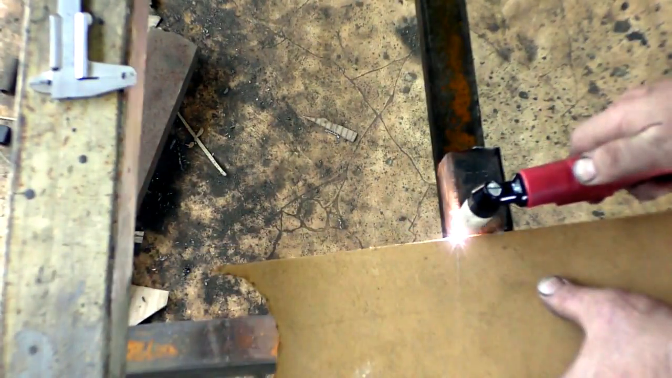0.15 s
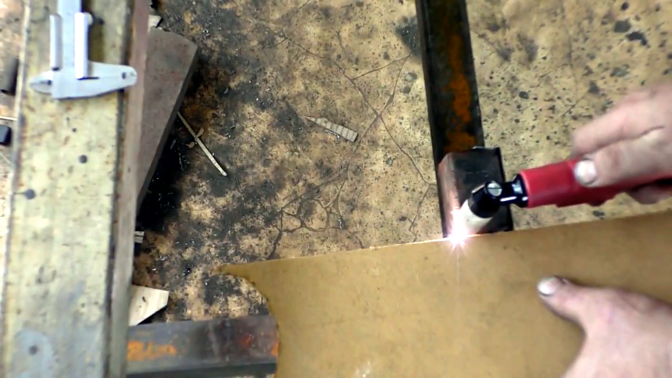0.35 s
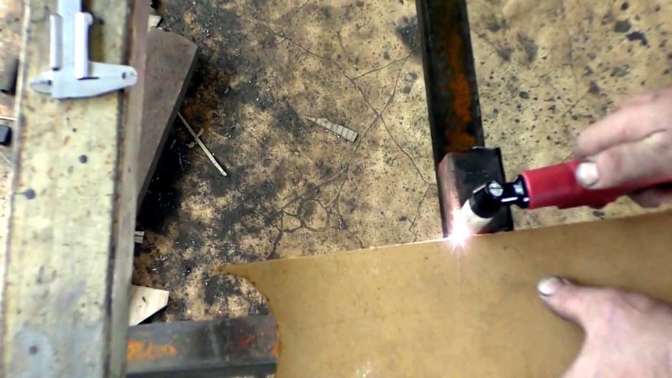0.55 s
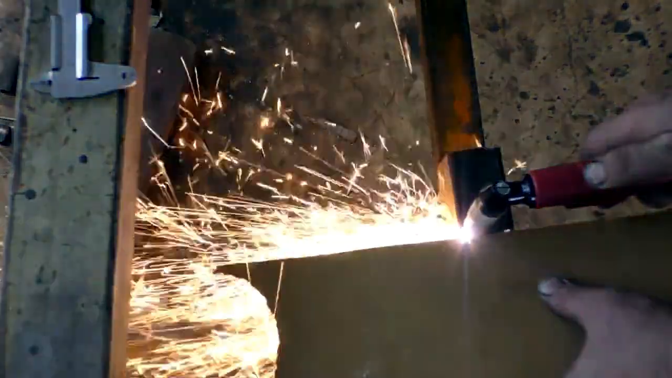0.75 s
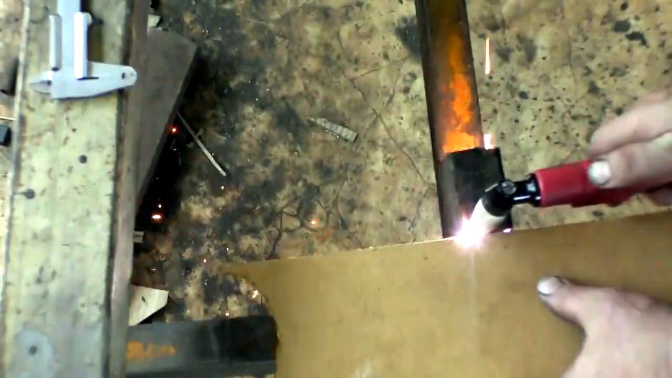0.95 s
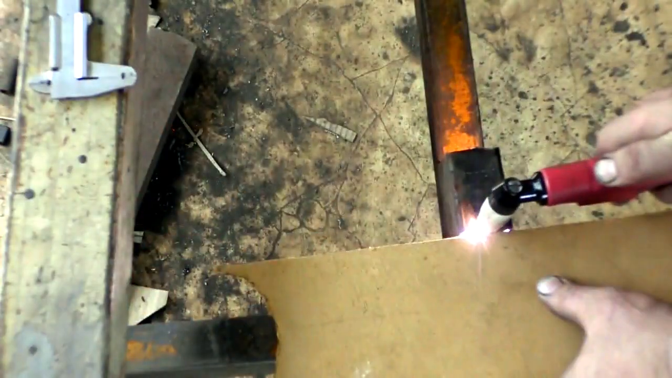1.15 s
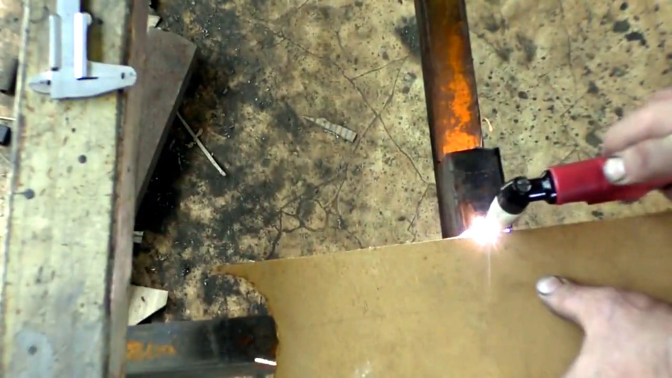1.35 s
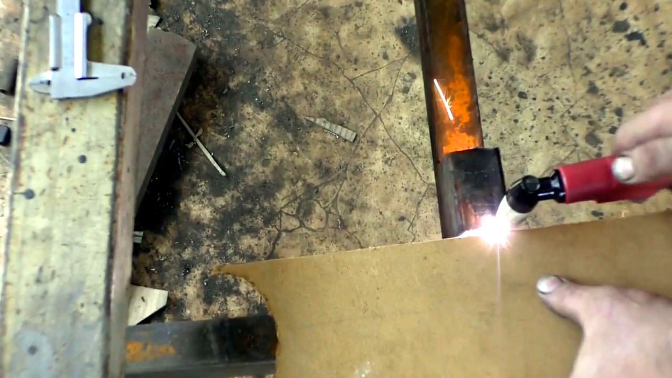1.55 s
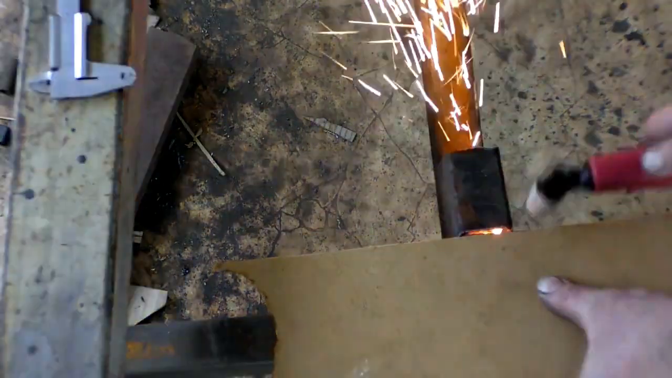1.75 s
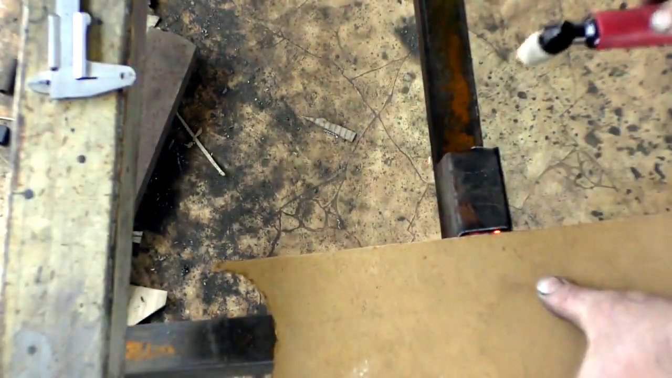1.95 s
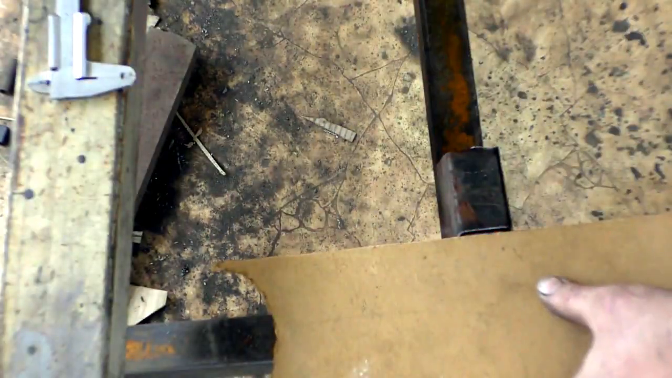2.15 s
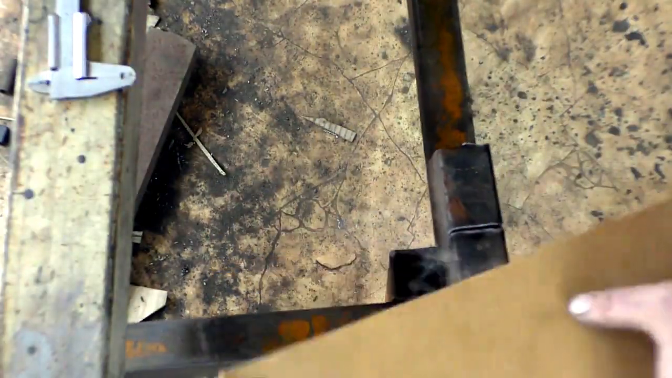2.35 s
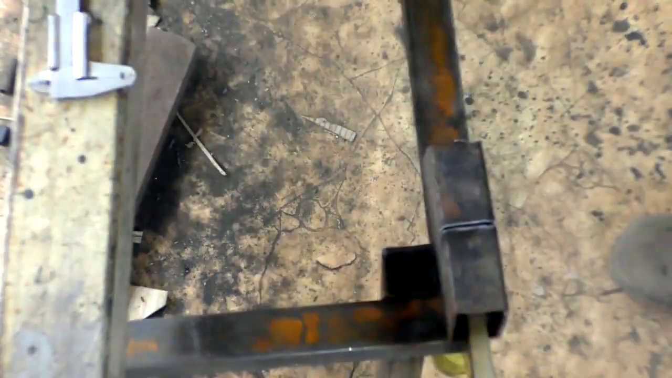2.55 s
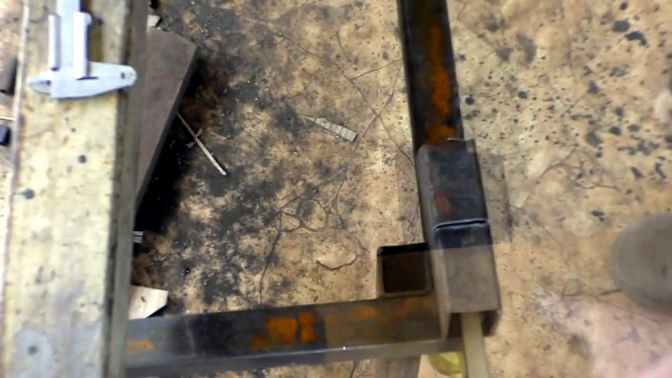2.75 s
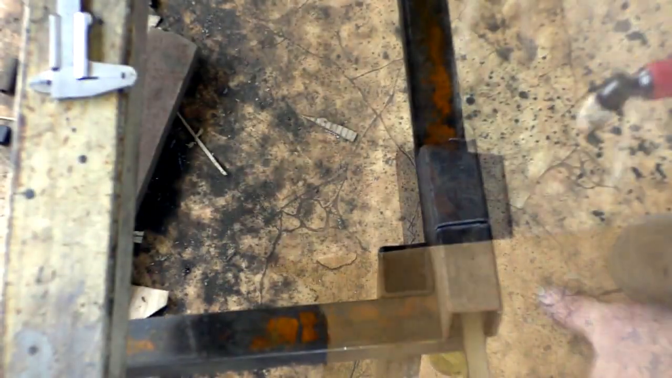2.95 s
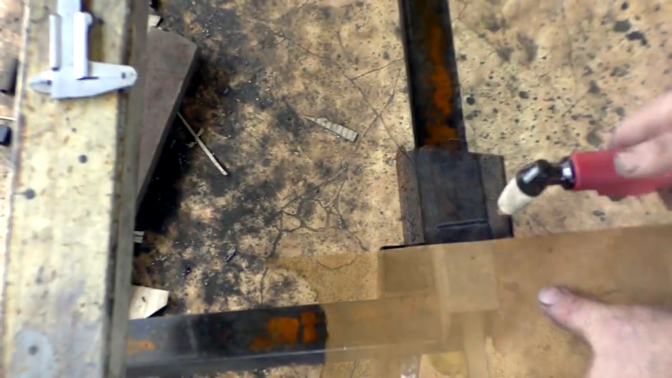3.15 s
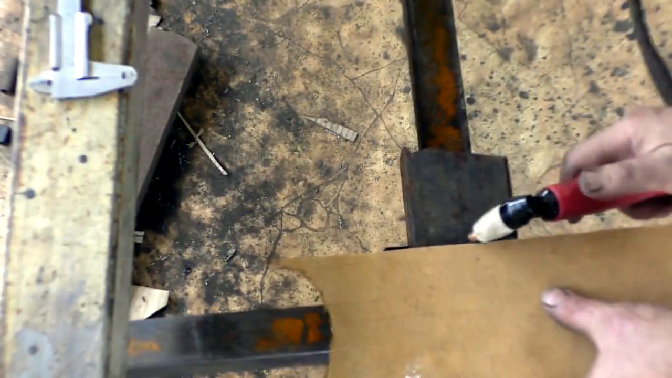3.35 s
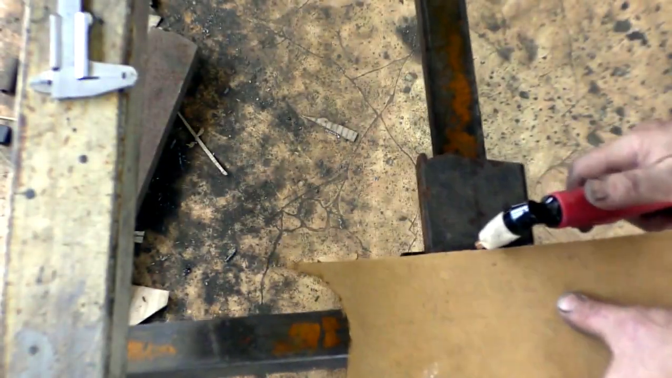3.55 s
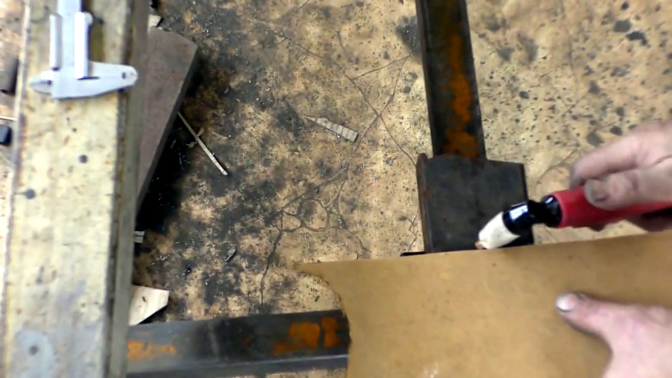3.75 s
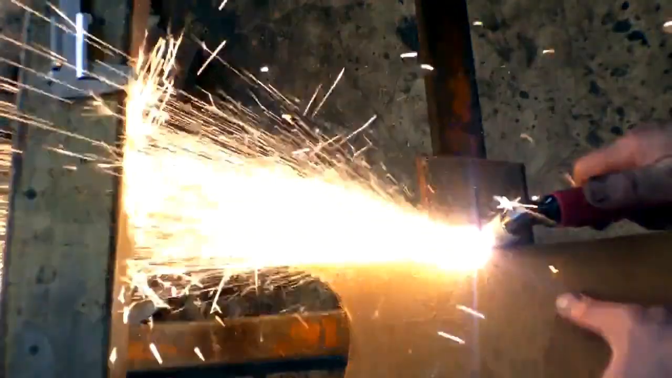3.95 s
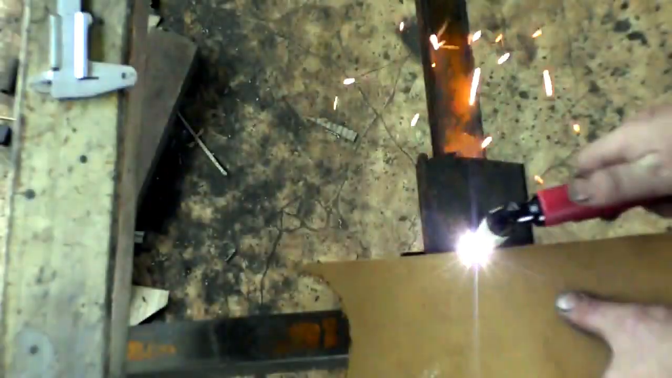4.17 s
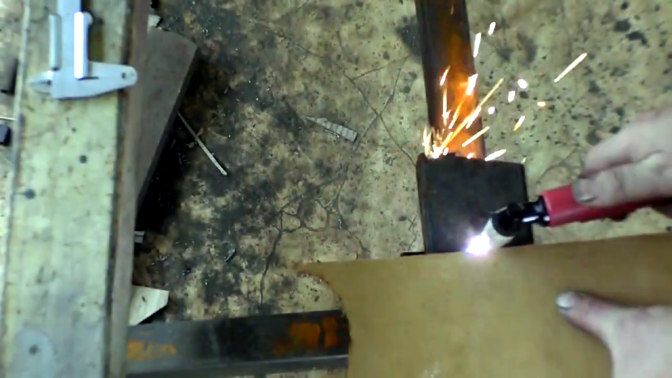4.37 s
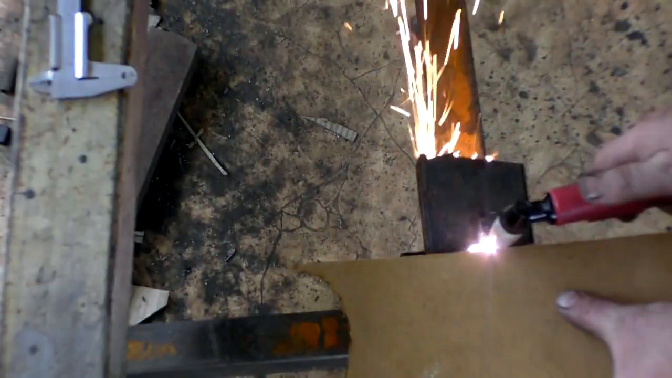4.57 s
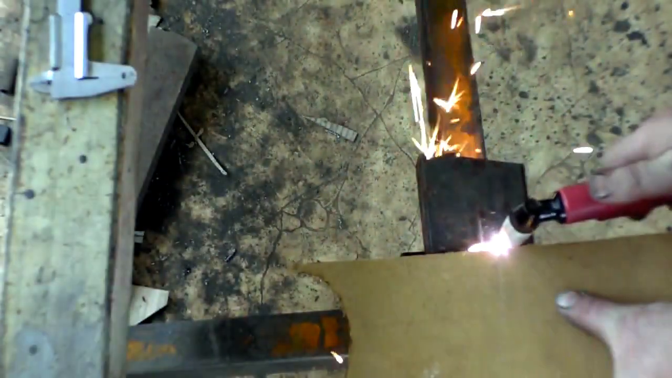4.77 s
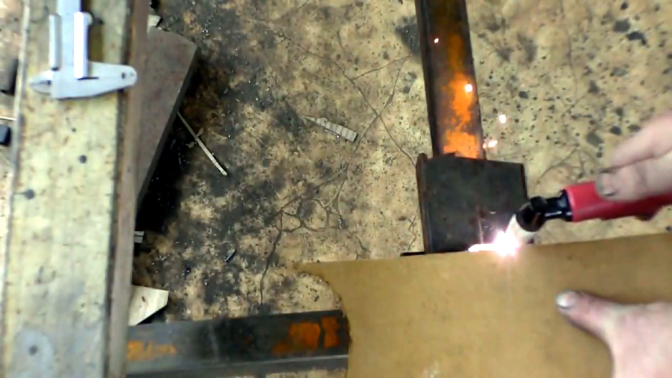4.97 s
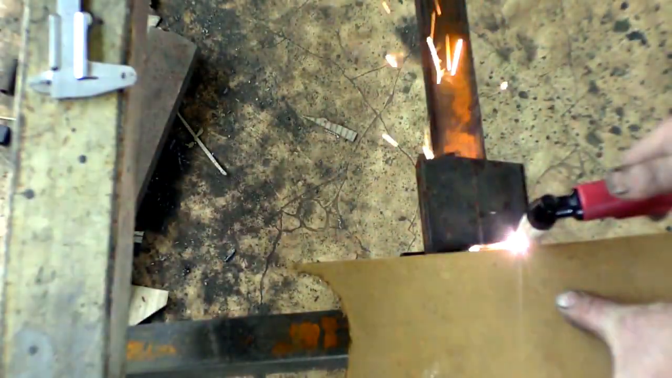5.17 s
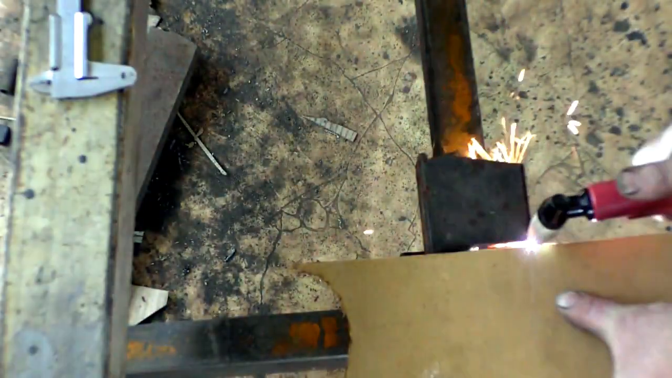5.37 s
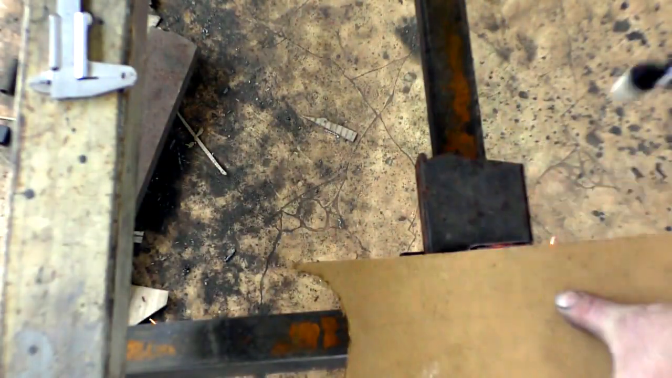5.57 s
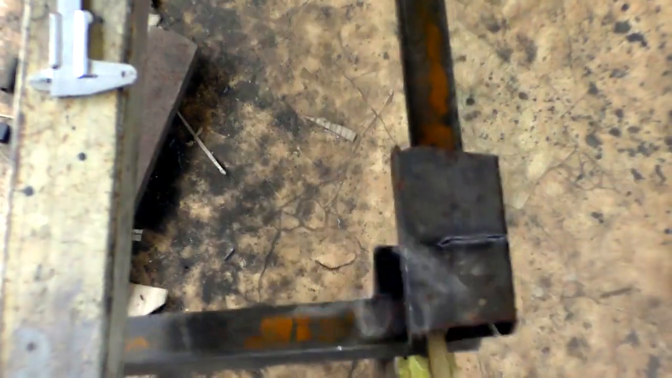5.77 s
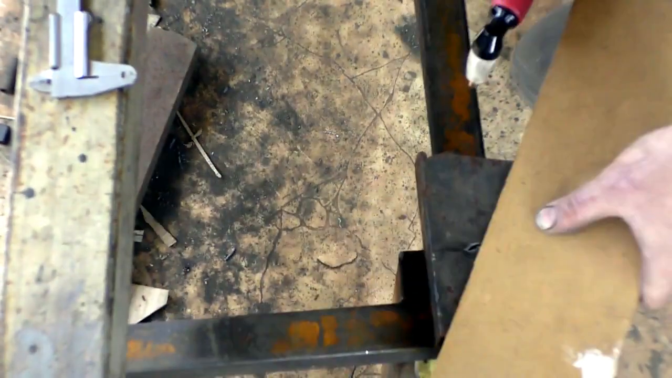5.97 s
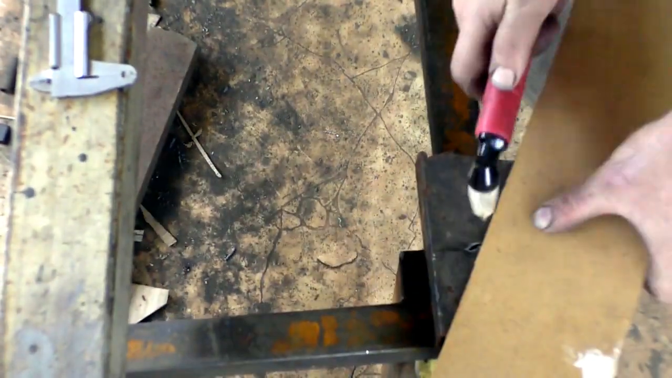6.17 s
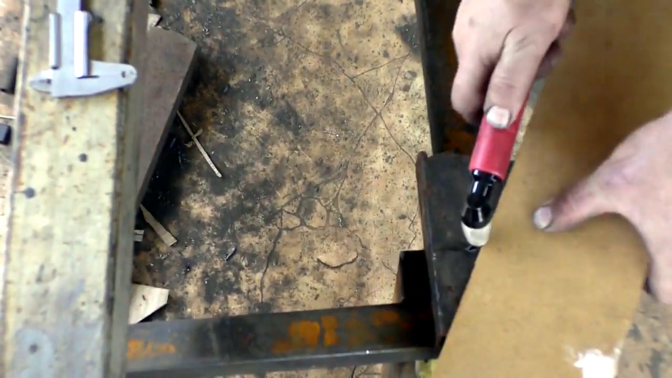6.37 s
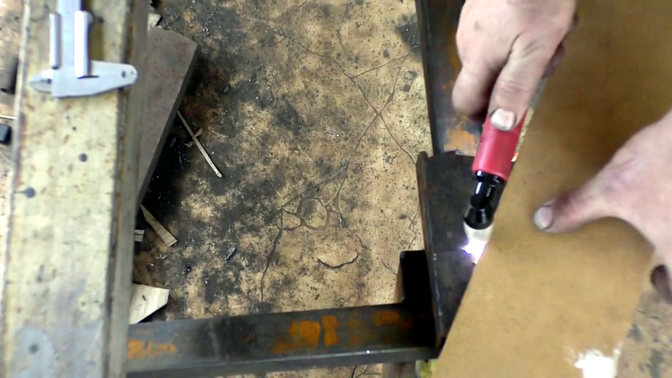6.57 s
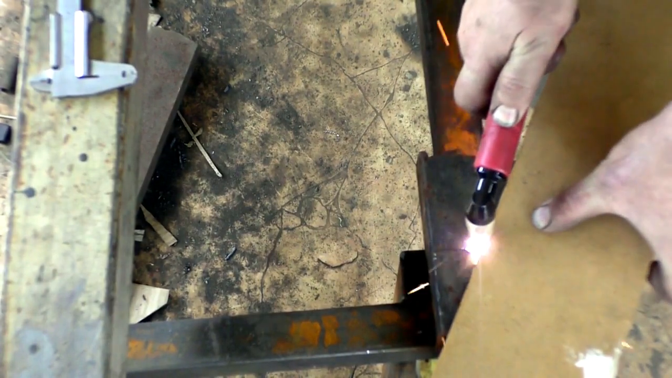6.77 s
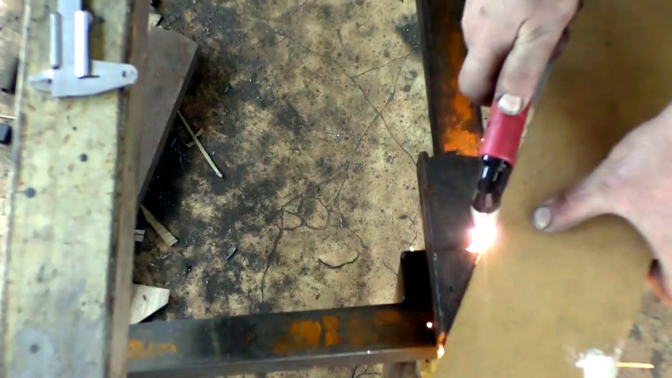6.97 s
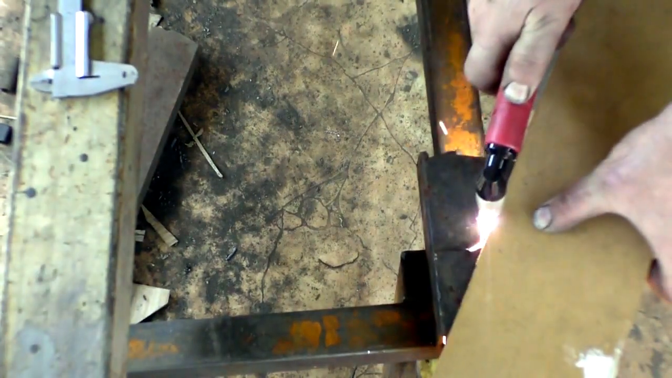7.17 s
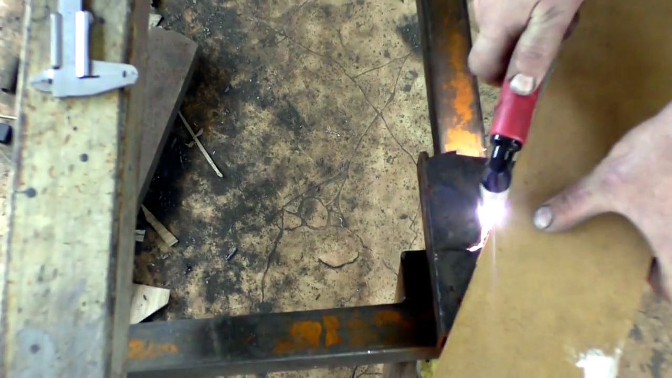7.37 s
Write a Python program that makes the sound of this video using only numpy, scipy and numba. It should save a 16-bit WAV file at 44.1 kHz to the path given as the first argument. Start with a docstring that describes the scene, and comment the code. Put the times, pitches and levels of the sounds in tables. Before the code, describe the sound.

A close stereo recording of a torch cutting steel tube in a garage. Right at the start a valve spits air, and at 0.1 s the arc snaps into a bright, dense hiss with a rough roar and hollow tube resonance. It wavers slightly until a thump at 1.8 s, then the air hiss trails on, with a bright puff and knocks around 2.25-2.4 s. After an abrupt join near 2.6 s, the quieter garage shows airy hiss, fan rumble and light knocks, with soft puffs and a faint low hum around 3.4-3.8 s. Air spits at 3.8 s and a second, stronger cut runs from 3.9 to 5.5 s, stuttering near its end and breaking with a thump; air continues. A heavy metallic knock lands at 5.8 s. From 6 s come hum and small ticking knocks, then air at 6.5 s and a third cut from 6.6 s, still hissing around 7.4 s. Gain control flattens the loud bursts.

```python
"""A hand torch cuts a square steel tube three times in a garage, in three stretches joined end to end.
Compressed air hisses as shaped noise; the arc adds hiss and roar and blows the tube's resonances.
Puffs of noise make valve spits, arc snaps, bright puffs and knocks on the tube.
Behind lie an airy hiss, a hollow mid-band noise, a rumble with rough fan tones and a low hum.
Left and right noises are unrelated; the recorder's gain control ducks everything while it is loud."""
import sys
import numpy as np
from scipy import signal
from scipy.io import wavfile
from scipy.ndimage import uniform_filter1d, map_coordinates
from numba import njit

SR = 44100
rng = np.random.default_rng(int(sys.argv[2]) if len(sys.argv) > 2 else 0)


def to_wav(s):
    """Save 16-bit WAV."""
    ch = np.atleast_2d(s).T  # columns
    pcm = np.round(np.clip(ch, -1, 1) * 32767)  # PCM
    wavfile.write(sys.argv[1], SR, pcm.astype(np.int16))


N = 327222


def torch():
    """The whole torch: air jet, arc hiss and roar, and the tube blown by the arc."""
    return air_flow() + arc_hiss() + roar() + blown_tube()


# Spectrum of the air without the arc: f/Hz, relative level per Hz/dB
FLOW_COLOUR = [(710, -49), (1200, -11), (1320, -10), (1460, -18), (1750, -11.5), (2590, -13), (10700, -1),
               (16000, -6)]


def air_flow():
    """Turbulent air from the nozzle, as noise that follows the flow."""
    flow = noise(FLOW_COLOUR, gust_db=0.5, patchy_db=1.0, rate=20, streak_db=6.0)
    return unit(flow, 9000, 15500) * flowing()


# Spectrum of the hiss while the arc burns: f/Hz, relative level per Hz/dB
HISS_COLOUR = [(410, -53), (700, -42), (1540, -22), (2190, -45), (3640, -10), (10700, 3), (16000, 1)]


def arc_hiss():
    """Bright hiss of the air jet while the arc burns."""
    hiss = noise(HISS_COLOUR, gust_db=1.26, patchy_db=0.44, rate=20, streak_db=4.5)
    return unit(hiss, 9000, 15500) * cutting(column=1)


# Spectrum of the arc roar and of the air splashing: f/Hz, relative level per Hz/dB
ROAR_COLOUR = [(150, -57), (400, -9), (900, -2), (2000, 2), (4000, 4.5), (7000, 1.5), (10000, 0.5),
               (16000, -16)]


def roar():
    """The arc roars in the kerf; before the strike the same noise is air splashing on the steel."""
    rush = noise(ROAR_COLOUR, gust_db=1.4, patchy_db=0.9, rate=24, streak_db=4.5)
    return unit(rush, 2000, 7000) * (cutting(column=2) + splashing())


# Main resonances of the steel tube: f/Hz, width/Hz, relative level/dB
TUBE = [(976, 68, 4.5), (1180, 98, 13), (1327, 32, 4), (1394, 21, 3.5), (1760, 110, -14)]
# Lowest resonances of the steel tube: f/Hz, width/Hz, relative level/dB
TUBE_LOW = [(513, 36, 4.5), (702, 42, 8.5)]


def blown_tube():
    """The arc's noise drives the resonances of the steel tube."""
    blow = noise([(100, 0), (5000, 0)], gust_db=-2.0, patchy_db=0.9, rate=22, streak_db=3.3)
    main_ring = unit(ring(blow, TUBE), 850, 1550) * cutting(column=3)
    low_ring = unit(ring(blow, TUBE_LOW), 460, 760) * cutting(column=4)
    return main_ring + low_ring


# The arc from strike to break: t/s, hiss level/dB in 9-15.5 kHz, then level over the hiss/dB of
# the roar, the tube ring and the low tube ring; all before the falters
CUTS = [
    [(0.115, -15.5, -2, -14, -22), (0.37, -12.5, -2, -20, -14), (0.65, -11, -2.5, -24, -25.5),
     (0.84, -8, -7, -13.5, -31), (1.14, -11, -5.5, -12.5, -23), (1.5, -5.5, -5.5, -13.5, -28.5),
     (1.72, -5.5, -6.5, -15, -14), (1.78, -9, -5, -10, -17)],
    [(3.893, -1.5, -12, -29, -34), (4.02, -2.5, -6.5, -33, -43), (4.06, -1, -5, -8, -49),
     (4.13, -7, -6, -14, -28), (4.18, -3, -10, -11.5, -20), (4.33, -3.5, -6.5, -5.5, -25.5),
     (4.46, -3, -7, -10, -22), (5.42, -11, -6.5, -11, -26.5), (5.507, -2.5, -5, -12, -27)],
    [(6.585, -13, -7.5, -9.5, -17.5), (6.86, -4.5, -7, -8, -30), (6.93, -3.5, -11, -32, -36),
     (7.05, -5, -6, -9, -28), (7.42, -7, -8, -12.5, -20.5)],
]
# The arc falters, dipping or lifting briefly: t/s, level change/dB
FALTERS = [(1.44, -1), (1.55, 0.5), (1.68, -2), (1.75, -0.5), (4.04, -2), (4.12, 1), (5.24, -3),
           (5.33, -2.5), (5.44, -4), (6.81, -3.5), (6.96, -1)]
ARC_RISE_S, ARC_T60_S = 0.026, 0.17  # fade-in at the strike; 60 dB decay after the break
FALTER_S = 0.022  # standard deviation of each bell-shaped falter


def cutting(column):
    """Gain of one part of the arc: silent before the strike, dying away after the break."""
    t, gain = np.arange(N) / SR, np.zeros(N)
    for rows in map(np.array, CUTS):
        strike, arc_break = rows[0, 0], rows[-1, 0]
        level = rows[:, 1] + (rows[:, column] if column > 1 else 0)
        decay_db = 60 * np.maximum(t - arc_break, 0) / ARC_T60_S
        rise = np.clip((t - strike) / ARC_RISE_S, 0, 1)
        gain += undb(np.interp(t, rows[:, 0], level) - decay_db) * rise
    falter_db = sum(db * np.exp(-.5 * ((t - s) / FALTER_S) ** 2) for s, db in FALTERS)
    return uniform_filter1d(gain, size=88) * undb(falter_db)


FLOW_DB = -24.5  # settled flow in 9-15.5 kHz
FLOW_START_DB, FLOW_RISE_S = -19.5, 0.038  # pressure builds after the valve opens
FLOW_SURGE_DB, FLOW_SURGE_S = 12, 0.42  # the hose gives more at first


def flowing():
    """Gain of the air: from each valve spit, surging at first, to the end of that stretch."""
    t, gain = np.arange(N) / SR, np.zeros(N)
    ends = [row[0] for row in STRETCHES[1:]] + [2 * N / SR]  # the last flow runs past the end
    for (s, *_), end, (_, _, _, fade_s, _) in zip(SPITS, ends, STRETCHES):
        since = np.abs(t - s)
        build_db = FLOW_START_DB * np.exp(-since / FLOW_RISE_S)
        surge_db = FLOW_SURGE_DB * np.exp(-since / FLOW_SURGE_S)
        fade = np.clip((end - t) / fade_s, 0, 1) ** 2
        gain += undb(FLOW_DB + build_db + surge_db) * (t >= s) * fade
    return gain


def splashing():
    """Gain of the air splashing on the steel from valve to strike, growing with the pressure."""
    t, gain = np.arange(N) / SR, np.zeros(N)
    for (s, _, _, splash_db), cut in zip(SPITS, CUTS):
        build_db = FLOW_START_DB * np.exp(-np.abs(t - s) / FLOW_RISE_S)
        gain += undb(splash_db + build_db) * (t >= s) * (t < cut[0][0] + ARC_RISE_S)
    return gain


# The arc snaps as it strikes and thumps as it breaks: t/s, peak level/dB, centre f/Hz
SNAPS = [(0.112, -8.5, 900), (1.78, -1, 450), (3.891, -5, 1100), (5.513, -2, 350), (6.585, -14, 1000)]


def arc_snaps():
    """Broad puffs of noise as the arc strikes and breaks."""
    return place([(s, undb(db) * burst(chance(), hz, 1.8 * hz, rise_s=0.0025, t60_s=0.041))
                  for s, db, hz in SNAPS])


# Valve spits as the air opens: t/s, peak level/dB, centre f/Hz,
# full-pressure level/dB in 2-7 kHz of the air splashing on the steel before the strike
SPITS = [(0.0152, -12.5, 9300, -24), (3.7924, -14.5, 9110, -26.5), (6.486, -19, 7260, -20.5)]


def valve_spits():
    """Short bright puffs as the valve lets the air out."""
    return place([(s, undb(db) * burst(chance(), hz, 0.27 * hz, rise_s=0.0039, t60_s=0.022))
                  for s, db, hz, _ in SPITS])


# Soft bright puffs of treble: t/s, peak level/dB
BRIGHT_PUFFS = [(2.25, -12.5), (3.33, -43.5), (3.4, -30), (3.44, -32.5), (3.485, -37), (3.55, -30),
                (3.705, -26.5), (3.75, -41)]


def bright_puffs():
    """Very broad puffs of noise with a soft onset."""
    return place([(s, undb(db) * burst(chance(), 10600.0, 24000.0, rise_s=0.0074, t60_s=0.12))
                  for s, db in BRIGHT_PUFFS])


# Knocks on the tube: t/s, then peak level/dB of thud, tube ring and tick
KNOCKS = [(2.279, -25.5, -26, -31), (2.372, -29.5, -40, -44), (2.647, -34, -38, -40),
          (3.424, -34, -23, -34), (3.73, -36, -46, -44), (3.796, -41, -23, -38), (5.794, -7, -18, -34),
          (5.994, -39.5, -36, -42), (6.19, -45, -35, -27), (6.265, -40, -19, -28), (6.329, -47, -29, -28.5),
          (6.377, -39, -47, -29.5)]


def knocks():
    """Each blow gives a low thud, a short ring of the tube and a tick, all from one burst of noise."""
    hits = []
    for s, thud_db, ring_db, tick_db in KNOCKS:
        c = chance()
        tube = ring(burst(c, hz=1270.0, width_hz=1100.0, rise_s=0.0006, t60_s=0.016), TUBE)
        tube = tube / np.abs(tube.mean(axis=0)).max()
        # the blow shoves the frame once, less on the right
        push = 1.0 * (np.arange(c.shape[1]) < .003 * SR) * np.array([[1], [.3]])
        thud = burst(c + push, hz=194.0, width_hz=310.0, rise_s=0.0029, t60_s=0.23)
        tick = burst(c, hz=2900.0, width_hz=560.0, rise_s=0.002, t60_s=0.073)
        hits.append((s, undb(thud_db) * thud + undb(tick_db) * tick + undb(ring_db) * tube))
    return place(hits)


# Spectrum of the airy background hiss: f/Hz, relative level per Hz/dB
AIRY_COLOUR = [(900, -16), (1900, -8), (2500, -10.5), (6000, -10), (7800, -10), (8800, -14), (13000, -18),
               (16000, -39)]
# Spectrum of the hollow mid-band noise: f/Hz, relative level per Hz/dB
HOLLOW_COLOUR = [(250, -36), (450, 0.5), (800, -2.5), (1400, -3.5), (2000, -2), (3000, -14.5),
                 (4500, -19.5)]
# The background hiss and mid band change level for a while:
# start t/s, end t/s, level change/dB of the airy hiss and of the hollow noise
BACKGROUND_LIFTS = [(0.0, .1, -1.5, 9), (1.8, 1.97, 0, 17.5), (2.587, 3.9, 0, 6.5), (5.97, 6.137, 3, 11),
                    (6.133, 6.3, 0, 9.5), (6.299, 6.41, 2, 10), (6.402, 6.56, 2.5, 8)]
AIRY_DB, HOLLOW_DB = -42, -51  # base levels in 2.5-8 kHz and 0.6-2.2 kHz (hollow without its resonances)


def garage_background():
    """Steady garage background: an airy hiss and a hollow mid-band noise with narrow resonances."""
    airy = noise(AIRY_COLOUR, gust_db=1.0, patchy_db=1.6, rate=35, streak_db=3.5)
    airy = unit(airy, 2500, 8000)
    hollow = noise(HOLLOW_COLOUR, gust_db=1.5, patchy_db=2.45, rate=25, streak_db=3.0)
    hollow = unit(hollow, 600, 2200)
    narrow_modes = [(hz, 0.28 * width, db) for hz, width, db in TUBE]
    hollow = hollow + undb(-6.5) * unit(ring(hollow, narrow_modes), 600, 2200)
    t = np.arange(N) / SR
    lift_db = sum(np.outer(db, (t >= s) * (t < end)) for s, end, *db in BACKGROUND_LIFTS)
    airy_db, hollow_db = uniform_filter1d(1. * lift_db, size=800)
    return airy * undb(AIRY_DB + airy_db) + hollow * undb(HOLLOW_DB + hollow_db)


# Spectrum of the rumble: f/Hz, relative level per Hz/dB
RUMBLE_COLOUR = [(12, -41), (20, -12.5), (199, -3), (255, 1), (303, -1.5), (459, -4), (800, -16.5),
                 (1040, -25), (1760, -120)]
# Rough fan tones, filtered twice: f/Hz, width/Hz per pass, relative level/dB per pass
FAN = [(208, 40, -0.5), (302.3, 31, -0.5)]
RUMBLE_DB = -40.5  # base level of the rumble in 100-420 Hz, without the fan tones


def fan_rumble():
    """Gusting low noise, with noise through narrow resonances for the rough fan tones."""
    rumble = unit(noise(RUMBLE_COLOUR, gust_db=3.0, patchy_db=2.5, rate=9, streak_db=0.5), 100, 420)
    fan = unit(ring(ring(rng.standard_normal((2, N)), FAN), FAN), 100, 420)
    return (rumble + undb(-3.0) * fan) * undb(RUMBLE_DB + stretch_db(column=4))


# The low hum swells twice, silent outside each swell: t/s, level/dB before the gains in hum()
HUM = [
    [(3.42, -62), (3.52, -48), (3.62, -48), (3.78, -62)],
    [(6.03, -47), (6.14, -47), (6.42, -38), (6.5, -48)],
]
HUM_HZ = 64.6  # centre of the wavering pitch


def hum():
    """A sine of wavering pitch, louder and just over a quarter cycle late on the right."""
    waver = np.repeat(rng.standard_normal(N // 2000 + 1), 2000)
    waver = uniform_filter1d(waver, size=2000)[:N]
    phase = 2 * np.pi * np.cumsum(HUM_HZ + 3.62 * waver) / SR
    tone = 2 * np.array([np.sin(phase), undb(4.5) * np.sin(phase - 1.8)])
    return undb(-1.5) * tone * curve(HUM, column=1)


def undb(db):
    """Gain of a level in dB."""
    return 10 ** (np.asarray(db) / 20)


def curve(tables, column):
    """Gain along time from tables of dB points, silent outside them."""
    t, gain = np.arange(N) / SR, np.zeros(N)
    for rows in map(np.array, tables):
        inside = (t >= rows[0, 0]) * (t <= rows[-1, 0])
        gain += undb(np.interp(t, rows[:, 0], rows[:, column])) * inside
    return uniform_filter1d(gain, size=88)


def unit(x, lo_hz, hi_hz):
    """Scale so that the band lo-hi of the left-right mean has rms 1."""
    sos = signal.butter(4, [lo_hz, hi_hz], "bandpass", fs=SR, output="sos")
    band = signal.sosfilt(sos, x.mean(axis=0))
    return x / np.sqrt(np.mean(band ** 2))


@njit
def resonator(x, hz, width):
    """State-variable band-pass, gain 1 at the centre."""
    y, b, l = np.empty(len(x)), 0., 0.
    g, k = np.tan(np.pi * hz / SR), width / hz
    for i in range(len(x)):
        v = (b + g * (x[i] - l)) / (1 + g * (g + k))
        b, l, y[i] = 2 * v - b, l + 2 * g * v, k * v
    return y


def ring(x, modes):
    """Both channels through parallel resonances, evened out for their widths."""
    return np.array([sum(undb(db) * resonator(c + 1e-18, 1. * hz, 1. * width) / np.sqrt(width)
                         for hz, width, db in modes) for c in x])


def noise(colour, gust_db, patchy_db, rate, streak_db):
    """Two unrelated coloured noises: all bands gust together, half octaves flicker, narrow streaks drift."""
    frame = 1024
    hop = frame // 4
    hz = np.arange(1, frame // 2 + 2) * SR / frame
    frames = 4 * N // frame + 8
    when = np.arange(frames) * frame / 4 / SR
    field = rng.standard_normal((200, 400))
    patch_grid = np.meshgrid(2 * np.log2(hz / hz[0]), rate * when, indexing="ij")
    patches = map_coordinates(field, patch_grid, order=1)
    # narrow streaks of the noise rise and fall slowly in level
    streak_grid = np.meshgrid(hz / 60., 9. * when, indexing="ij")
    streaks = map_coordinates(field.T, streak_grid, order=1, mode="wrap")
    gusts = np.interp(rate * when, np.arange(field.shape[1]), field[-1])
    colour_hz, colour_db = np.array(colour).T
    shape = np.interp(np.log(hz), np.log(colour_hz), colour_db)
    gain = undb(shape[:, None] + patchy_db * patches + gust_db * gusts + streak_db * streaks)
    white = rng.standard_normal((2, (frames - 1) * hop))
    spectrum = signal.stft(white, nperseg=frame, noverlap=3 * hop)[2]
    return signal.istft(spectrum * gain, nperseg=frame, noverlap=3 * hop)[1][:, :N]


def chance():
    """A quarter second of white noise, unrelated left and right, to make one hit from."""
    return rng.standard_normal((2, SR // 4))


def burst(white, hz, width_hz, rise_s, t60_s):
    """A puff of band noise that rises and dies away; its left-right mean peaks at 1."""
    t = np.arange(white.shape[1]) / SR
    envelope = (1 - np.exp(-t / rise_s)) * np.exp(-np.log(1000) * t / t60_s)
    puff = ring(white * envelope, [(hz, width_hz, 0)])
    return puff / np.abs(puff.mean(axis=0)).max()


def place(hits):
    """Lay hits (start in s, sound) along time."""
    out = np.zeros((2, N + SR))
    for s, sound in hits:
        out[:, int(s * SR):][:, :sound.shape[1]] += sound
    return out[:, :N]


def stretch_db(column):
    """One column of the stretches, held along time."""
    starts = [row[0] for row in STRETCHES]
    index = np.searchsorted(starts, np.arange(N) / SR, side="right") - 1
    return np.array(STRETCHES)[index, column]


def scene():
    """All sources; a faint, fast tremolo lies on the steady noises, though not on rumble or hum."""
    tremolo = 1 + 0.064 * np.sin(2 * np.pi * 187.5 * np.arange(N) / SR)
    steady = (torch() + garage_background()) * tremolo
    hits = valve_spits() + bright_puffs() + arc_snaps() + knocks()
    return steady + fan_rumble() + hum() + hits


@njit
def follow(wanted_db, attack, settle, margin_db, climb_db):
    """Falls quickly to near the wanted gain, settles on it slowly, climbs back at a steady pace."""
    out, db = np.empty(len(wanted_db)), 0.
    for i in range(len(wanted_db)):
        over = db - wanted_db[i]
        if over > 0:
            db -= settle * over + attack * max(over - margin_db, 0.)
        else:
            db -= max(-climb_db, over)
        out[i] = db
    return out


# Three stretches of work joined end to end: start t/s, fade-in start level/dB, fade-in time/s,
# fade-out time of the air at the end/s (not used in the last), rumble level over its base level/dB
STRETCHES = [(0.0, 0, 1, 0.079, -2), (2.587, -5.5, 1.0, 0.0009, 1), (5.981, -1, 1, .001, 0)]
THRESHOLD_DB, RATIO = -30, 7.2  # gain control: level where ducking starts, compression ratio
LISTEN_S, AHEAD_S = 0.02, 0.0014  # time it averages over, time it listens ahead
ATTACK_S, SETTLE_S, MARGIN_DB = 0.002, 0.066, 1  # within the margin only the slow settling acts
CLIMB_DB_PER_S = 37


def record(dry):
    """Gain control ducks everything when loud, afresh in each stretch; the top is cut steeply."""
    out = []
    parts = np.split(dry, [int(row[0] * SR) for row in STRETCHES[1:]], axis=1)
    for (_, in_db, in_s, *_), part in zip(STRETCHES, parts):
        t = np.arange(part.shape[1]) / SR
        keep = np.exp(-1 / (LISTEN_S * SR))
        power = signal.lfilter([1 - keep], [1, -keep], np.mean(part ** 2, axis=0))
        heard_db = 10 * np.log10(power + 1e-12)
        wanted_db = -(1 - 1 / RATIO) * np.maximum(heard_db - THRESHOLD_DB, 0)
        gain_db = follow(wanted_db, 1 / (ATTACK_S * SR), 1 / (SETTLE_S * SR),
                         1. * MARGIN_DB, CLIMB_DB_PER_S / SR)
        gain_db = np.interp(t + AHEAD_S, t, gain_db)
        fade_db = in_db * np.clip(1 - t / in_s, 0, 1)
        out.append(part * undb(gain_db + fade_db))
    top_cut = signal.ellip(12, .3, 90, 15850, fs=SR, output="sos")
    return signal.sosfilt(top_cut, np.hstack(out))


dry = scene()
out = record(dry)
to_wav(out)
```